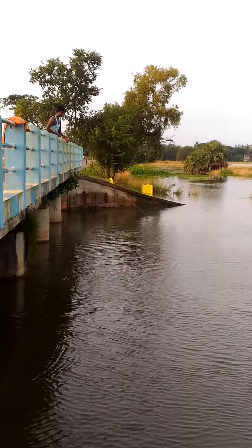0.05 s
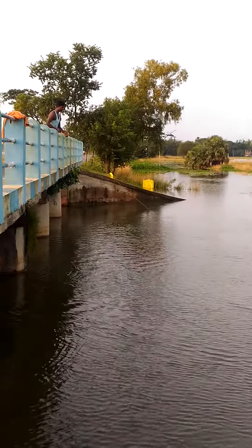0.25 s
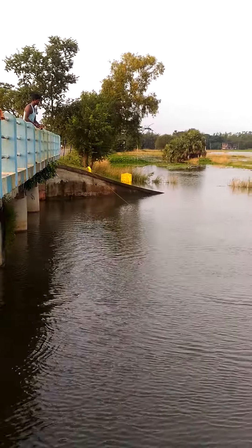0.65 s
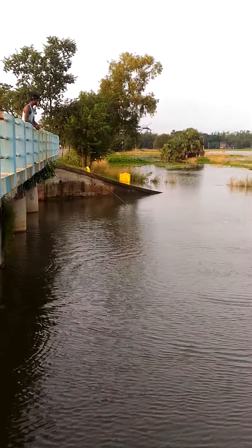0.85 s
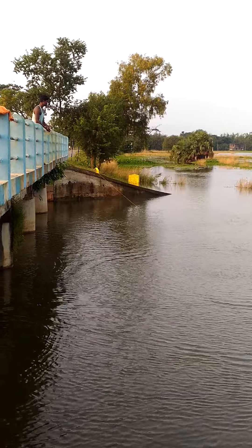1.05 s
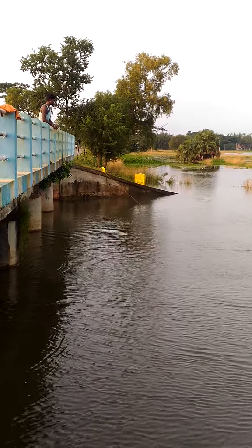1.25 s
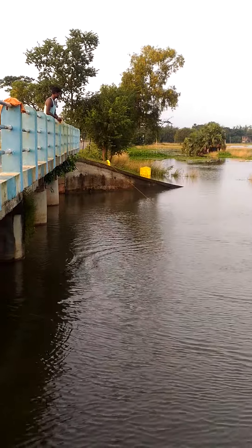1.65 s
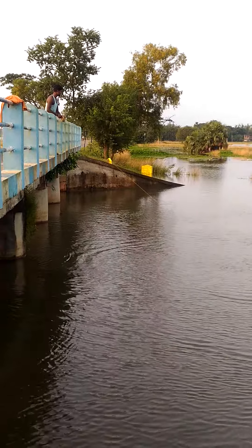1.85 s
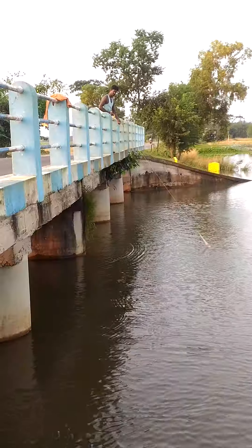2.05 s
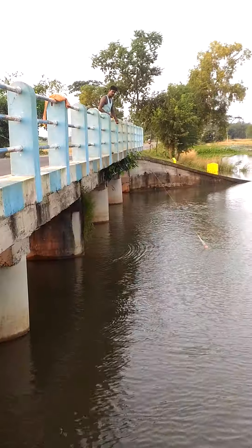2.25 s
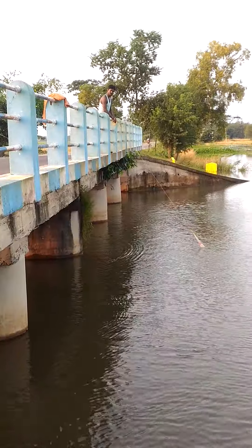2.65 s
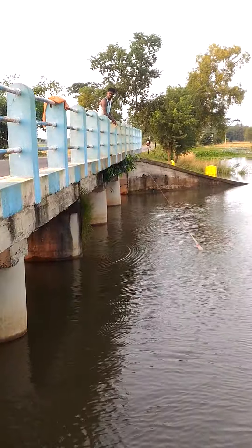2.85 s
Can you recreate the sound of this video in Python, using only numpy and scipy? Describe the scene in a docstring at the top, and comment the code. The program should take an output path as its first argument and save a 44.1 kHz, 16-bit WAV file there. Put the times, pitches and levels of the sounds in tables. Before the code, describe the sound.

A vehicle approaches on a river bridge, its tyres roaring and hissing ever louder over a low engine drone. The sound cuts off abruptly, leaving quiet open air, wind thumping on the microphone and faint, distant bird chirps.

```python
"""On a river bridge a vehicle draws near: its tyres roar, hum and hiss ever louder over an engine drone.
The sound drops out, returns for an instant and fades quickly into quiet open air by the water.
There, puffs of wind thump on the two microphone ports (the left and right openings)
and small birds chirp far off."""
import sys
import numpy as np
from scipy import signal
from scipy.fft import rfft, irfft, next_fast_len
from scipy.io import wavfile
from scipy.ndimage import map_coordinates

SR = 44100
rng = np.random.default_rng(int(sys.argv[2]) if len(sys.argv) > 2 else 0)


def int16_out(signal):
    """Quantize to a 16-bit WAV file."""
    q = np.round(np.clip(np.atleast_2d(signal).T, -1, 1) * 32767)
    wavfile.write(sys.argv[1], SR, q.astype(np.int16))


N = 132300


def amp(db):
    """Turn decibels into a number to multiply by."""
    return 10 ** (np.asarray(db) / 20)


def unit(x):
    """Scale a sound so that its average strength (rms) is 1."""
    return x / np.sqrt(np.mean(x ** 2) + 1e-20)


def clock():
    """The time of every sample, in seconds."""
    return np.arange(N) / SR


def ramp(start, end):
    """Rise from 0 to 1 between two times."""
    return np.clip((clock() - start) / (end - start), 0, 1)


def along(points, hz):
    """Read a table at any frequency, joining its rows on a log scale."""
    f, *cols = np.transpose(points)
    return np.array([np.interp(np.log(hz + 1), np.log(f + 1), c) for c in cols])


def curves(rows):
    """Join the rows of a time table into one curve per column."""
    s, *cols = np.transpose(rows)
    return [np.interp(clock(), s, c) for c in cols]


def wobble(rate):
    """A smooth curve through rate random values a second."""
    return map_coordinates(rng.standard_normal(4096), [clock() * rate], mode="wrap")


def filtered(x, response):
    """Turn each frequency up or down by response(hz)."""
    m = next_fast_len(N + SR // 2)
    return irfft(rfft(x, m) * response(np.fft.rfftfreq(m, 1 / SR)), m)[..., :N]


def panned(x, db):
    """Make stereo: db louder on the left, db softer on the right."""
    return x * amp([[db], [-db]])


def tone(hz):
    """A pure tone that follows a pitch curve."""
    return np.sin(2 * np.pi * np.cumsum(hz) / SR)


def narrow(hz, width_hz):
    """Noise in a narrow band around a pitch that may move."""
    phase = 2 * np.pi * np.cumsum(hz * np.ones(N)) / SR
    return unit(wobble(width_hz) * np.cos(phase) + wobble(width_hz) * np.sin(phase))


def rush(colour, stereo):
    """Partly alike noise at the two ports, each with its own colour (mix of low and high)."""
    shared, own = rng.standard_normal((2, N))
    alike = lambda hz: np.clip(along(stereo, hz)[0], 0, 1)
    right = filtered(shared, lambda hz: alike(hz) * np.exp(-1j * along(stereo, hz)[1]))
    right += filtered(own, lambda hz: np.sqrt(1 - alike(hz) ** 2))
    return filtered(np.array([shared, right]), lambda hz: amp(along(colour, hz)))


def band_rms(x, low_hz, high_hz):
    """How strong the average of left and right is between two frequencies."""
    return np.std(filtered(x.mean(0), lambda hz: (hz > low_hz) & (hz < high_hz)))


# How the tyres grow louder: t/s, roar level/dB, hiss level/dB
APPROACH = [(0, -60, -69.5), (0.3, -58, -68), (0.5, -56.5, -66.5), (0.7, -56.5, -64.5), (0.9, -56, -63.5),
            (1.0, -53.5, -63), (1.22, -53, -61), (1.37, -52, -54.5), (1.46, -51, -55.5), (1.56, -49.5, -54),
            (1.66, -46.5, -49.5), (1.76, -45, -46), (1.83, -44, -45.5), (1.95, -42, -46.5),
            (2.07, -41.5, -45)]
# Tyre colour far off, midway and close by: f/Hz, left level/dB, right level/dB
FAR_COLOUR = [(50, -7.5, -10), (160, -8, -14), (318, -6.5, -14), (443, -3.5, -12.5), (680, -14.5, -20),
              (910, -8, -17.5), (1190, -7.5, -12.5), (1590, -15, -14), (2070, -20.5, -19.5),
              (2640, -18.5, -21.5), (3450, -19.5, -25.5), (4350, -30, -32), (5000, -28.5, -39.5),
              (5570, -26.5, -44), (6340, -19.5, -32.5), (7270, -27, -35.5), (9460, -32, -35.5),
              (11700, -42.5, -55), (14000, -44.5, -56)]
MIDWAY_COLOUR = [(49.5, -6, -9), (158, -3.5, -10.5), (304, -5.5, -12.5), (437, 0, -8.5), (656, -8, -13.5),
                 (945, -4, -12), (1135, -3.5, -7.5), (1550, -8, -11.5), (1820, -13, -24.5),
                 (2600, -16.5, -20), (3470, -16.5, -27), (4230, -22.5, -30.5), (5030, -23.5, -43),
                 (5800, -17, -32.5), (6400, -14, -31.5), (7600, -23, -32.5), (9406, -29.5, -34),
                 (11500, -40.5, -51.5), (14000, -47.5, -54)]
NEAR_COLOUR = [(50, -10.5, -12), (160, -8.5, -16.5), (420, -5.5, -15.5), (720, -10, -16), (880, -1, -8.5),
               (1170, -1, -12.5), (1420, -5, -6), (1880, -7.5, -15), (2500, -12.5, -21), (3500, -9, -17.5),
               (3920, -15, -28), (4420, -12, -22.5), (5000, -10.5, -36), (5940, -6, -23), (6380, -3, -25.5),
               (7300, -11.5, -29.5), (8400, -16, -20), (10000, -19, -28.5), (12300, -32, -52),
               (13800, -33, -43)]
# When far turns to midway, then midway to near: start t/s, end t/s
COLOUR_TURNS = [(.75, 1.1), (1.4, 1.707)]
# How alike the ports hear the road: f/Hz, likeness/0-1, left port's lead/rad
ROAD_STEREO = [(60, .96, 0), (450, .96, -.1), (750, .89, -.2), (1200, .87, -.45), (1500, .72, -.15),
               (1750, .45, .3), (2100, .52, .9), (2600, .48, 2), (3500, .4, 3.9), (4400, .35, 4.3),
               (5100, .15, 6.3), (6400, .22, 8)]

def tyres(split_hz=3650, roar_flutter_db=1.07, hiss_flutter_db=1.0):
    """Rubber rolling on the road roars and hisses, louder and brighter as it nears."""
    roar_db, hiss_db = curves(APPROACH)
    roar_gain = amp(roar_db - 0.2 + roar_flutter_db * wobble(29.68))
    hiss_gain = amp(hiss_db - 0.17 + hiss_flutter_db * wobble(60))
    closer, close = (ramp(start, end) for start, end in COLOUR_TURNS)
    stages = (FAR_COLOUR, 1 - closer), (MIDWAY_COLOUR, closer * (1 - close)), (NEAR_COLOUR, close)
    out = 0
    for colour, share in stages:
        noise = rush(colour, ROAD_STEREO)
        lows = filtered(noise, lambda hz: 1 / (1 + (hz / split_hz) ** 4))
        roar = roar_gain * lows / band_rms(noise, 700, 2500)
        hiss = hiss_gain * (noise - lows) / band_rms(noise, 4500, 12000)
        out += np.sqrt(share) * (roar + hiss)
    return out


# Hum of the tyre tread: t/s, f/Hz, level/dB
TREAD_HUM = [(0, 429, -67.5), (.13, 422.5, -66), (.21, 423.6, -57.5), (.36, 440, -64.5), (.46, 418, -59),
             (.57, 415, -57), (.76, 415, -57.5), (.88, 432.4, -60), (1.0, 422.4, -57), (1.2, 434.5, -62.5),
             (1.36, 442.3, -55.5), (1.43, 434.6, -69), (1.65, 410, -58), (1.78, 422.4, -60)]

def tread(waver_hz=27.6, throb_db=0.5, roughness=0.7):
    """The tread blocks make a rough hum that throbs and comes in surges."""
    hz, db = curves(TREAD_HUM)
    hum = unit(tone(hz + waver_hz * wobble(130)) * amp(throb_db * wobble(70)))
    rough_hum = unit(hum + roughness * narrow(hz, width_hz=130.6))
    return panned(amp(db) * rough_hum, db=3.5)


# Engine tones, the first at the firing rate: f/Hz, level at average roar/dB, growth/dB per dB of roar
ENGINE_TONES = [(59.65, -65, 0.7), (121.4, -67, 0.3), (205, -73.5, 0.1), (636.5, -74, 0.6)]

def engine(pitch_wander=0.0137, waver_db=2, rasp_db=-71.5, rasp_growth=0.32, rasp_swing_db=3.5):
    """An unsteady low drone grows with the tyre roar, and each firing adds a light rasp."""
    roar_db = curves(APPROACH)[0]
    nearer_db = roar_db - roar_db.mean()
    engine_time = np.cumsum(1 + pitch_wander * wobble(7.98)) / SR  # runs a little fast or slow
    drone = 0
    for hz, db, growth in ENGINE_TONES:
        gain = amp(db + growth * nearer_db + waver_db * wobble(9.1))
        drone += gain * np.sqrt(2) * np.sin(2 * np.pi * (hz * engine_time + rng.random()))
    firing = unit(amp(rasp_swing_db * np.cos(2 * np.pi * ENGINE_TONES[0][0] * engine_time)))
    rasp = amp(rasp_db + rasp_growth * nearer_db) * firing * narrow(hz=2506, width_hz=330)
    return panned(drone + rasp, db=6)


# Swells of ringing air: middle t/s, half length/s, f/Hz, level/dB
GROOVE_SWELLS = [(0.96, .04, 1240, -56.5), (1.265, .06, 1080, -55.5), (1.83, .035, 1180, -43.5)]

def grooves():
    """Air rings in the tyre grooves, standing out of the roar in short swells."""
    ring = 0
    for s, half, hz, db in GROOVE_SWELLS:
        swell = np.exp(-((clock() - s) / half) ** 2)
        ring += amp(db) * swell * narrow(hz, width_hz=380)
    return panned(ring, db=3)


# Colour of the open air: f/Hz, left level/dB, right level/dB
AIR_COLOUR = [(50.3, 17, 9), (126, 13, 9.5), (300, 8.5, 1), (465, -0.5, -6), (700, 1, -10.5),
              (1110, -7.5, -12), (1560, -9.5, -15.5), (2400, -8.5, -16), (3260, -7, -15), (3940, -11, -18),
              (4600, -18, -24.5), (6700, -16, -28.5), (8000, -22.5, -29), (9450, -19.5, -29),
              (11800, -26.5, -34), (14000, -22.5, -36)]
# How alike the ports hear the air: f/Hz, likeness/0-1, left port's lead/rad
AIR_STEREO = [(102, 0.5, -7.5), (1500, 0.08, -5.5), (3400, 0.2, 4), (5000, 0, 2)]

def open_air(level_db=-57, waver_db=0.34):
    """The air by the water is a quiet, deep, almost steady rush."""
    return amp(level_db + waver_db * wobble(7.9)) * unit(rush(AIR_COLOUR, AIR_STEREO))


# Faint tones: f/Hz, pitch waver/Hz, level/dB
WHINE_TONES = [(1015, 3.7, -84.5), (1137, 16.2, -84), (1970, 4, -88.5)]

def whine(waver_db=3):
    """Very faint tones waver, mostly on the left."""
    tones = 0
    for hz, waver_hz, db in WHINE_TONES:
        tones += amp(db + waver_db * wobble(15)) * tone(hz + waver_hz * wobble(60))
    return panned(tones, db=5.2)


# Puffs of wind: middle t/s, half length/s, left level/dB, right level/dB
PUFFS = [(2.124, 0.062, -49.5, -70), (2.213, 0.016, -43.5, -56), (2.463, 0.043, -44.5, -49),
         (2.525, 0.062, -49, -46.5), (2.587, 0.0093, -63, -38), (2.647, 0.052, -58, -38.5),
         (2.7, 0.044, -52, -44), (2.96, 0.075, -52, -63)]
# Colour of a soft and of a hard puff: f/Hz, level/dB
SOFT_PUFF = [(20, -19), (45, 3), (90, 2.5), (140, -1), (220, -29), (400, -46), (900, -60), (3000, -100)]
HARD_PUFF = [(20, -14), (50, -21), (85, 0), (200, -5.5), (300, -9.5), (500, -21), (900, -47), (3000, -90)]
# Small swirls of air hitting a port: t/s, f/Hz, left level/dB, right level/dB
SWIRLS = [(2.234, 106, -29, -59), (2.513, 152, -34.5, -49), (2.633, 130, -60, -27.5),
          (2.658, 158, -53, -24.5), (2.675, 120, -33.5, -36)]

def wind(hard_above_db=-39.5):
    """Puffs rumble on each port separately, brighter when harder; single swirls thump."""
    t = clock()
    power = sum(amp([[left], [right]]) ** 2 * np.exp(-2 * ((t - s) / half) ** 2)
                for s, half, left, right in PUFFS)
    hardness = power / (power + amp(hard_above_db) ** 2)
    flow = rng.standard_normal((2, N))
    soft = unit(filtered(flow, lambda hz: amp(along(SOFT_PUFF, hz))))
    hard = unit(filtered(flow, lambda hz: amp(along(HARD_PUFF, hz))))
    out = np.sqrt(power) * ((1 - hardness) * soft + hardness * hard)
    for s, hz, left, right in SWIRLS:
        away = (np.pi * hz * (t - s)) ** 2
        thump = (1 - 2 * away) * np.exp(-away)  # one push, with a dip before and after
        out += amp([[left], [right]]) * thump
    return out


# Distant chirps: t/s, length/s, start f/Hz, middle f/Hz, end f/Hz, level/dB
CHIRPS = [(2.15, 0.051, 3560, 3470, 3520, -74.5), (2.471, 0.032, 3260, 3160, 3150, -81),
          (2.514, 0.057, 3120, 3224, 3060, -75), (2.529, 0.021, 3480, 3620, 3600, -73.5),
          (2.208, .19, 2810, 3200, 3920, -85), (2.6, 0.042, 3080, 3400, 3540, -77.5),
          (2.634, 0.024, 3200, 3110, 3080, -78), (2.882, 0.016, 4500, 3970, 3850, -73.5),
          (2.916, 0.017, 3950, 3700, 3450, -77), (2.966, 0.0097, 3100, 2750, 2450, -76)]

def birds(jitter_hz=70, jitter_per_glide=0.149, echo_gain=0.38, echo_s=0.2):
    """Small birds sing thin, gliding chirps, blurred by the trees on the bank."""
    t, song = clock(), np.zeros(N)
    for s, length, start_hz, middle_hz, end_hz, db in CHIRPS:
        progress = np.clip((t - s) / length, 0, 1)
        glide = np.interp(progress, [0, .5, 1], [start_hz, middle_hz, end_hz])
        jitter = (jitter_hz + jitter_per_glide * abs(end_hz - start_hz)) * wobble(900)
        swell = np.sqrt(2 * abs(np.sin(np.pi * progress)))
        song += amp(db) * swell * tone(glide + jitter)
    tail = rng.standard_normal((2, SR // 2)) * amp(-60 * t[:SR // 2] / echo_s)
    echo = signal.fftconvolve(song[None], tail / np.linalg.norm(tail[0]), axes=1)[:, :N]
    return panned(song + echo_gain * echo, db=7)


# Hoarse calls: middle t/s, half length/s, f/Hz, level/dB
FAR_CALLS = [(2.358, .06, 4000, -83), (2.39, .11, 6230, -87)]

def far_calls():
    """Soft, hoarse calls come from far along the bank."""
    calls = 0
    for s, half, hz, db in FAR_CALLS:
        swell = np.exp(-((clock() - s) / half) ** 4)
        calls += amp(db) * swell * narrow(hz, width_hz=940)
    return panned(calls, db=7)


def scene():
    """The vehicle quickly fades out as the quiet riverside fades in."""
    vehicle = tyres() + tread() + engine() + grooves()
    riverside = open_air() + whine() + wind() + birds() + far_calls()
    fade = ramp(2.067, 2.078)
    return (1 - fade) * vehicle + fade * riverside


def record(dry):
    """The microphone loses the deepest bass and highest treble; a tenth of a second drops out."""
    low_cut_hz, top_hz = 52.3, 14200
    drop_s, return_s, edge_s = 1.9565, 2.0592, 0.0006
    outside_gap_s = np.maximum(drop_s - clock(), clock() - return_s)
    sound_on = np.clip(outside_gap_s / edge_s + .5, 0, 1)
    thinned = filtered(dry, lambda hz: (hz / low_cut_hz) ** 4 / np.sqrt(1 + (hz / low_cut_hz) ** 8))
    return filtered(thinned * sound_on, lambda hz: hz < top_hz)


dry = scene()
out = record(dry)
int16_out(out)
```